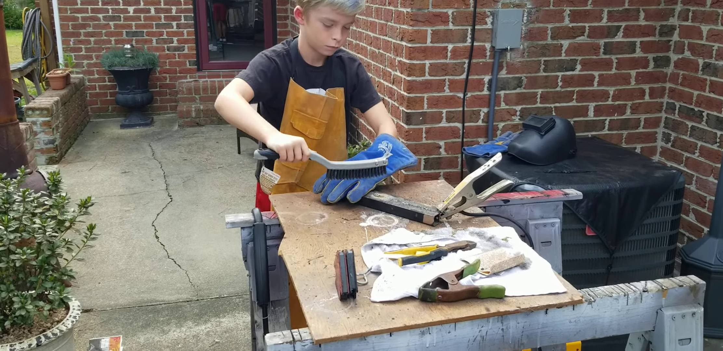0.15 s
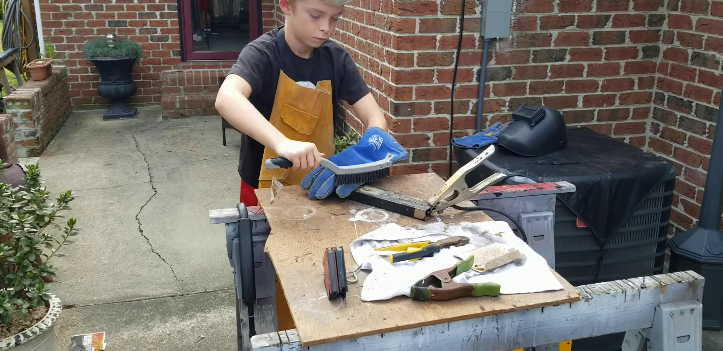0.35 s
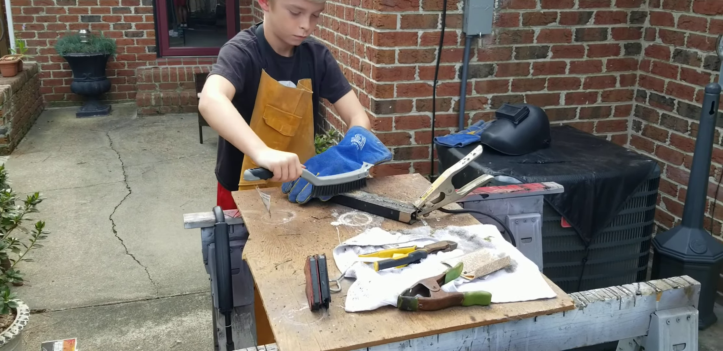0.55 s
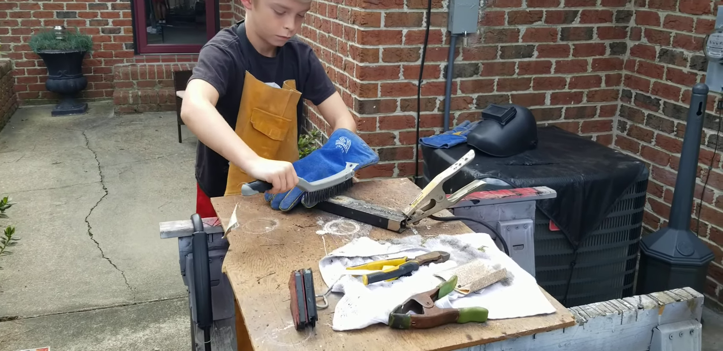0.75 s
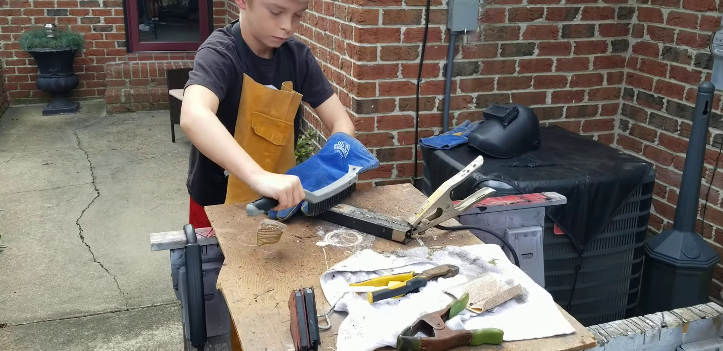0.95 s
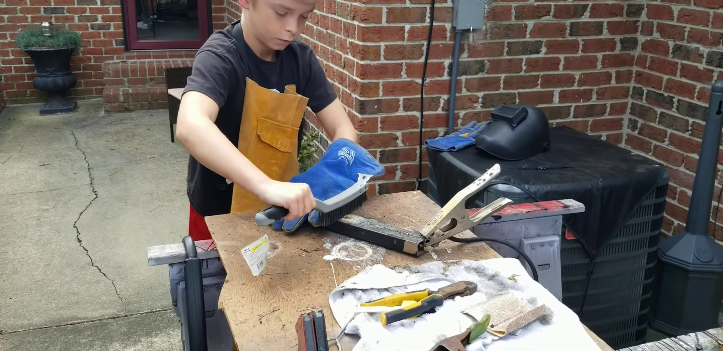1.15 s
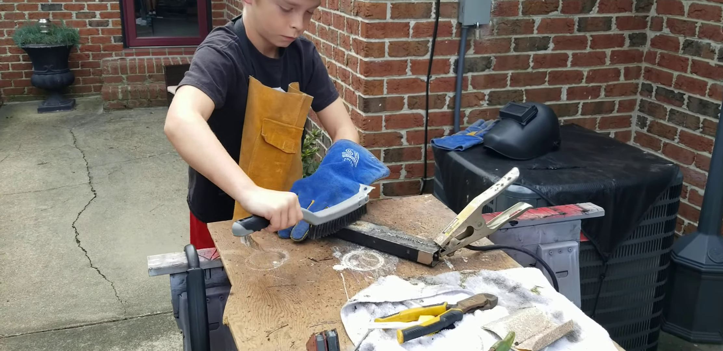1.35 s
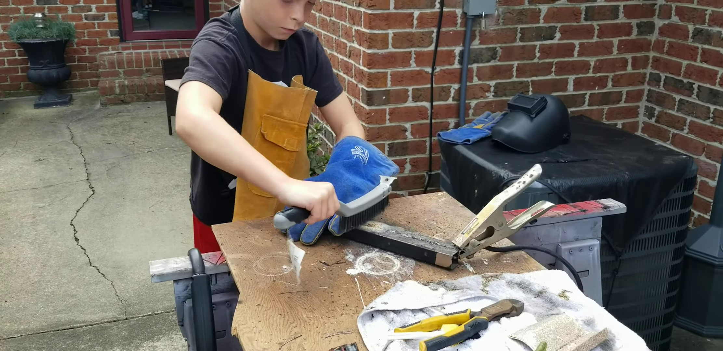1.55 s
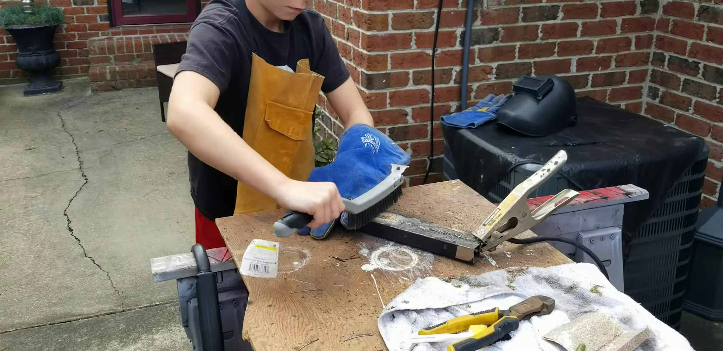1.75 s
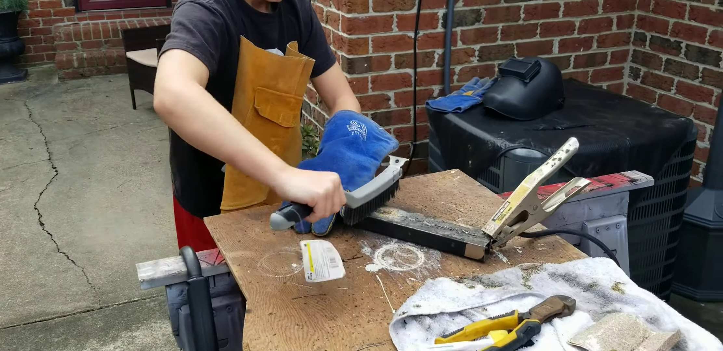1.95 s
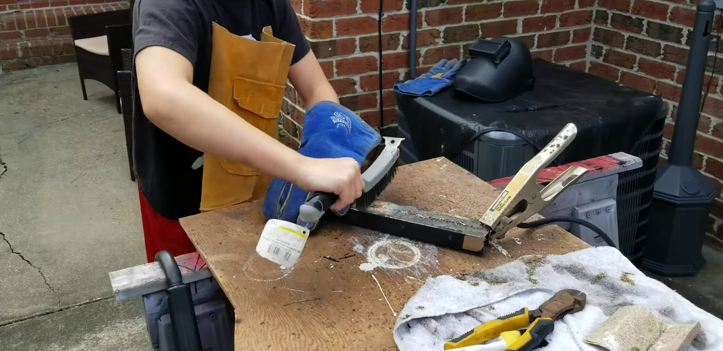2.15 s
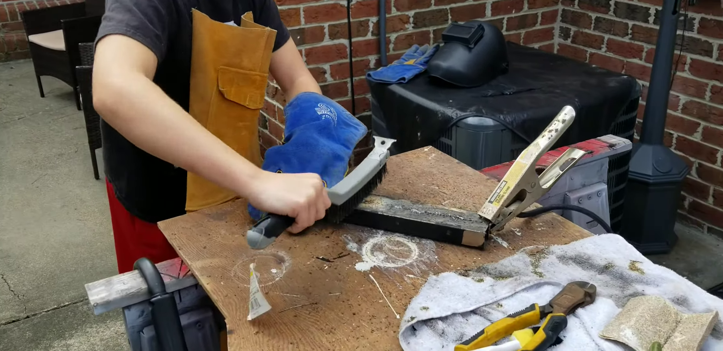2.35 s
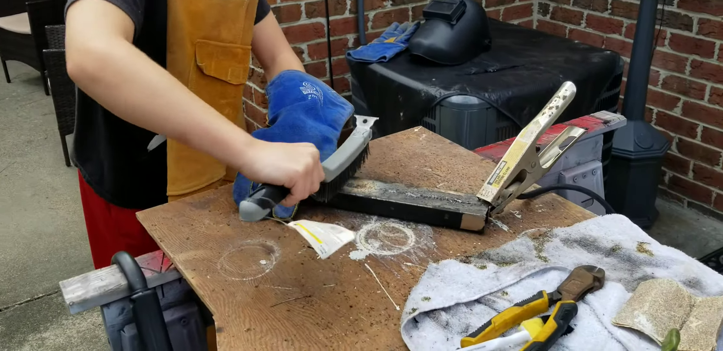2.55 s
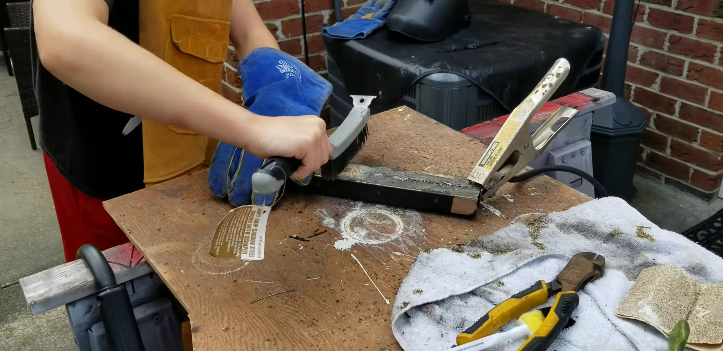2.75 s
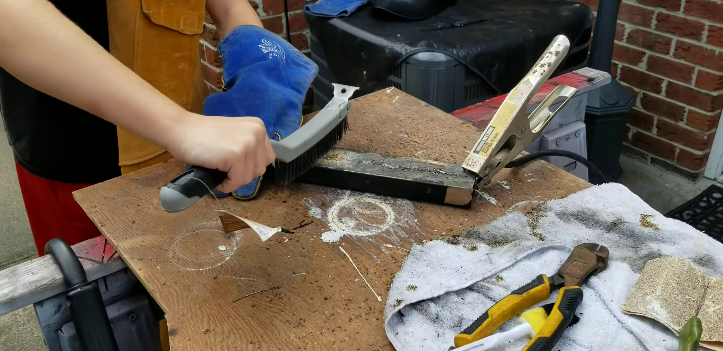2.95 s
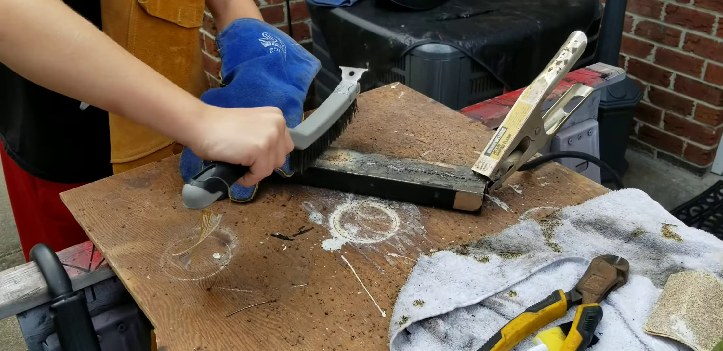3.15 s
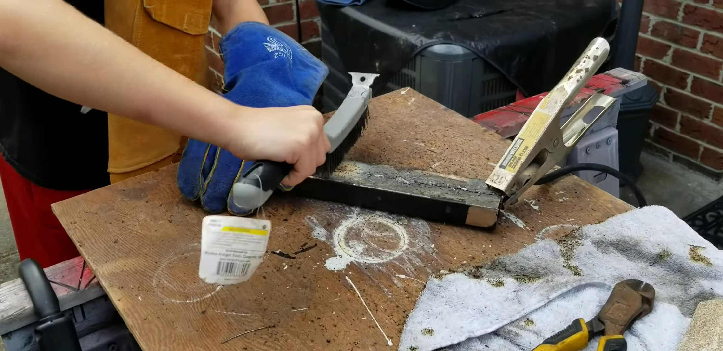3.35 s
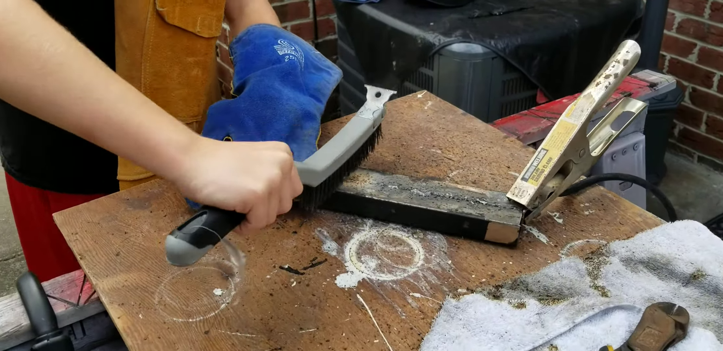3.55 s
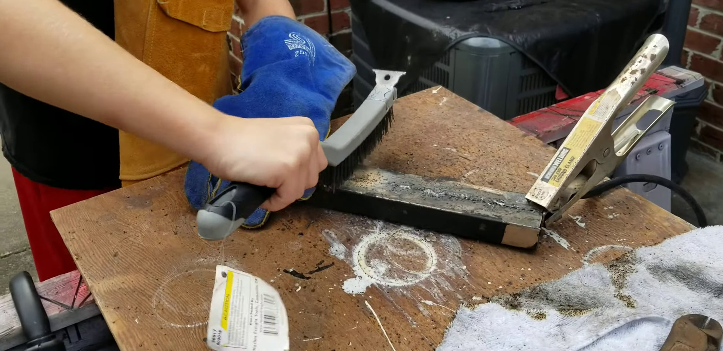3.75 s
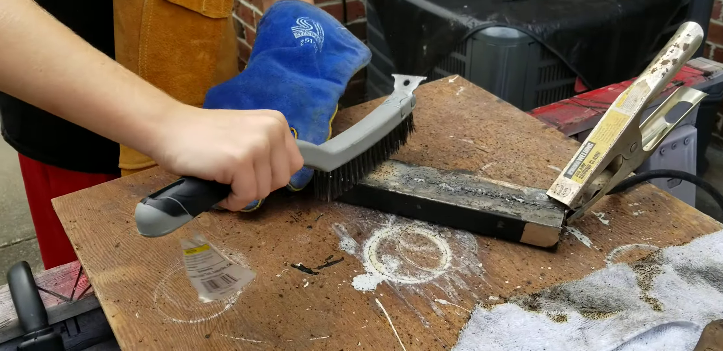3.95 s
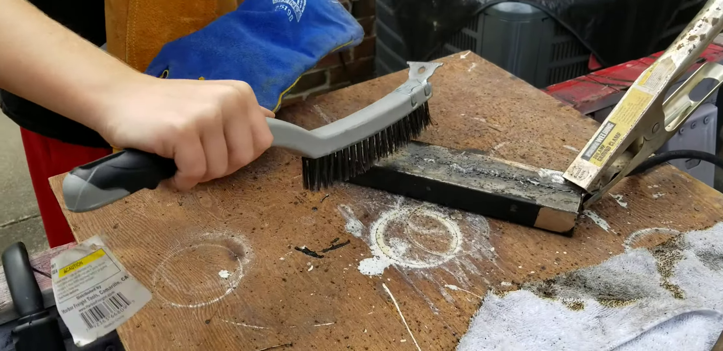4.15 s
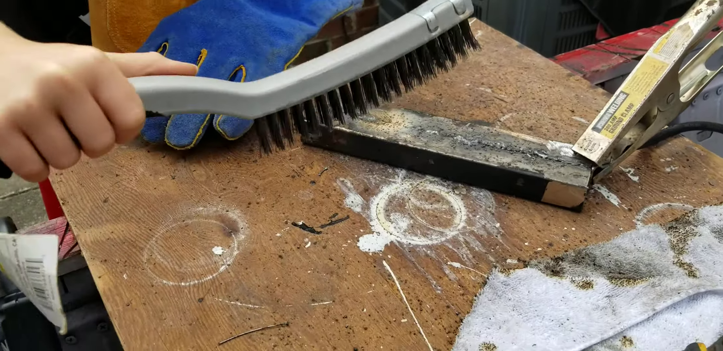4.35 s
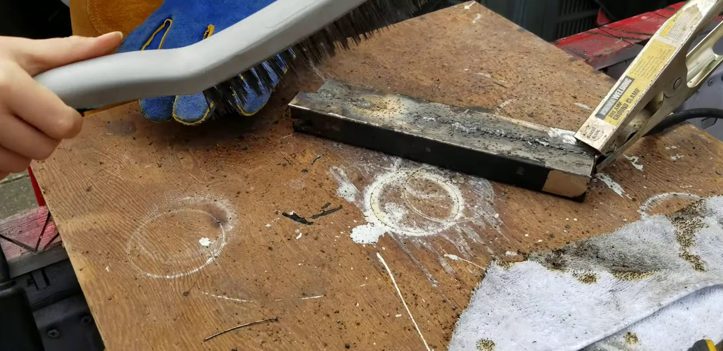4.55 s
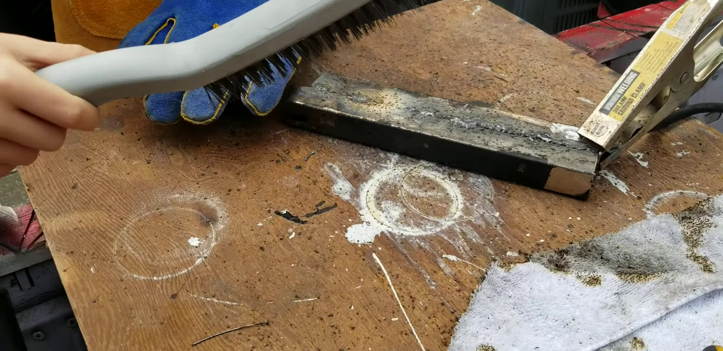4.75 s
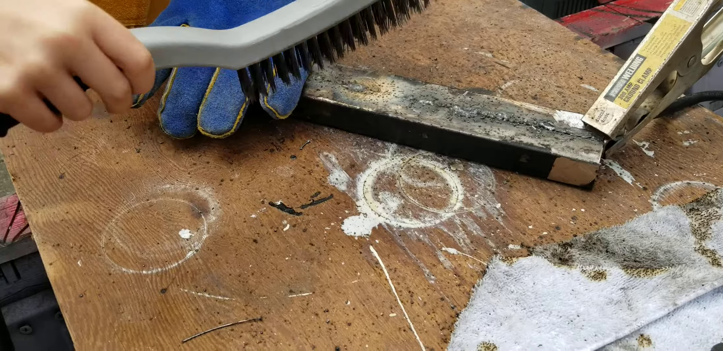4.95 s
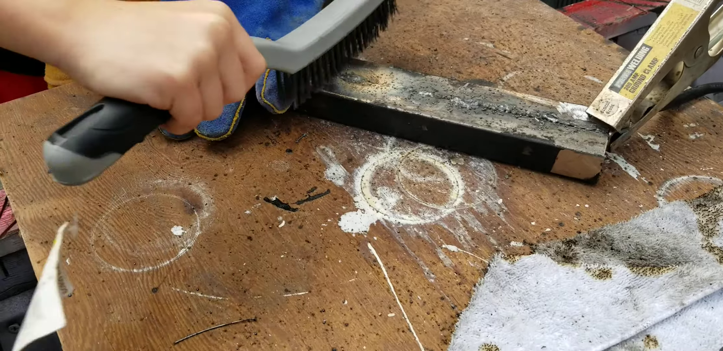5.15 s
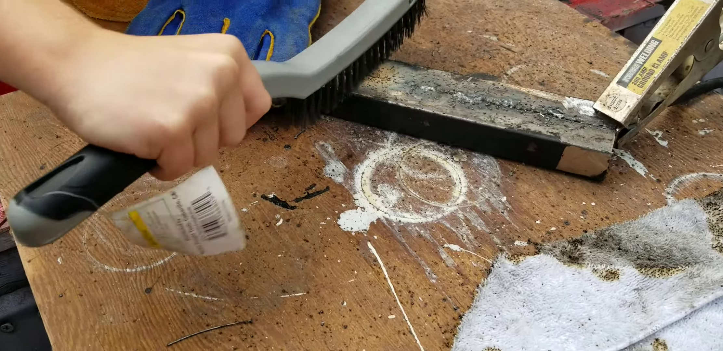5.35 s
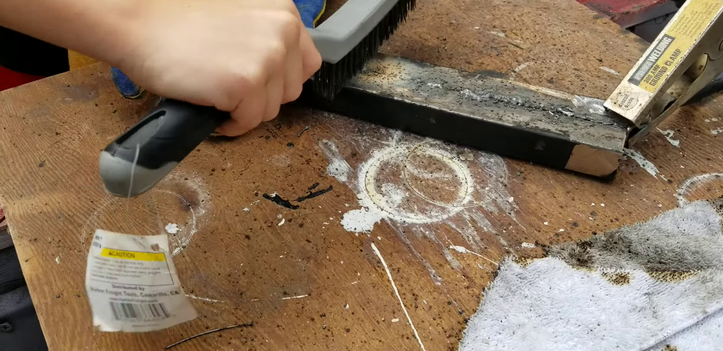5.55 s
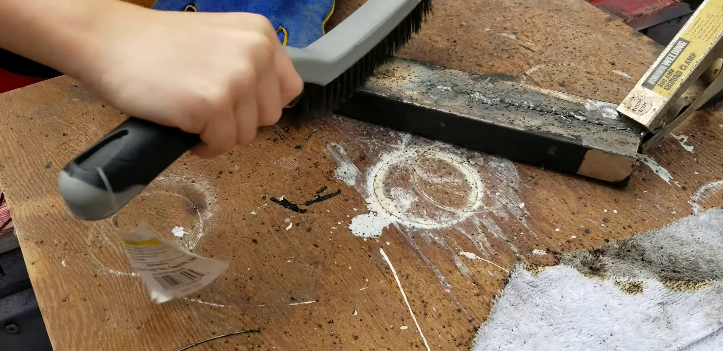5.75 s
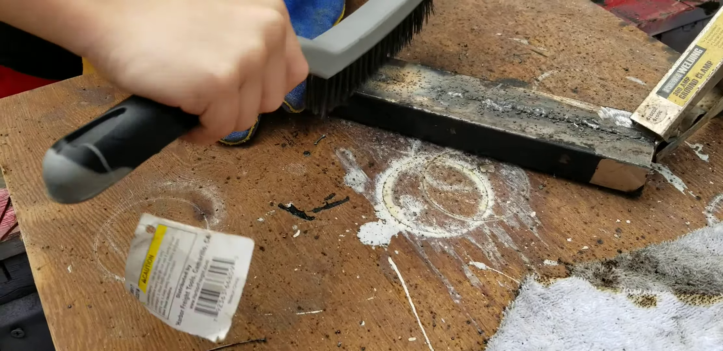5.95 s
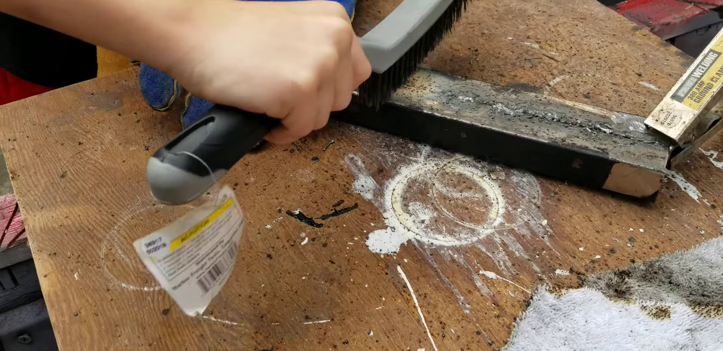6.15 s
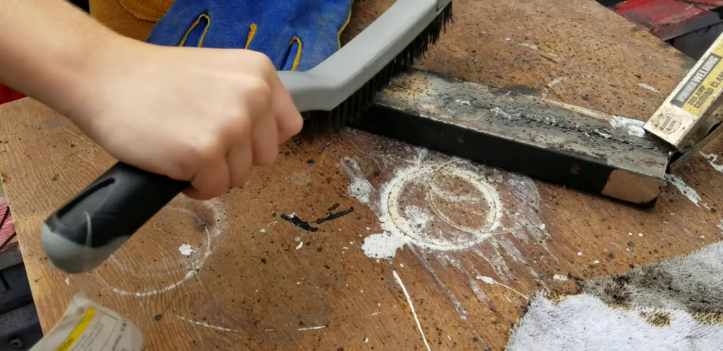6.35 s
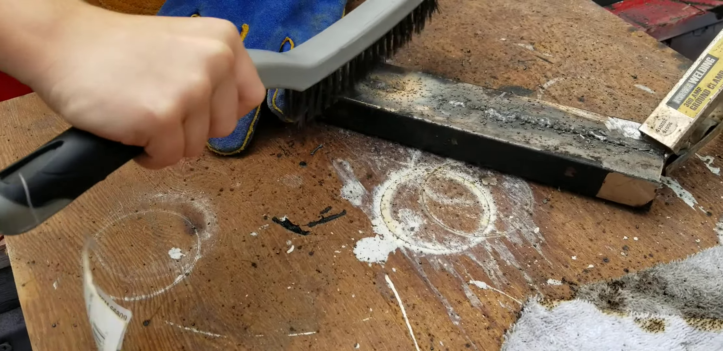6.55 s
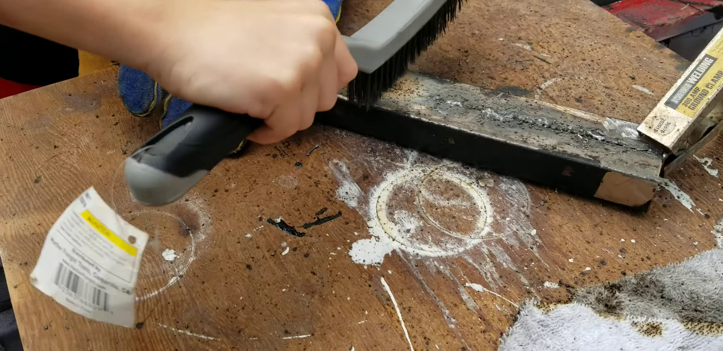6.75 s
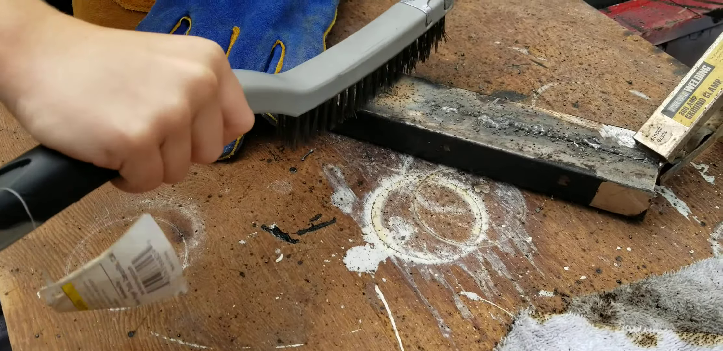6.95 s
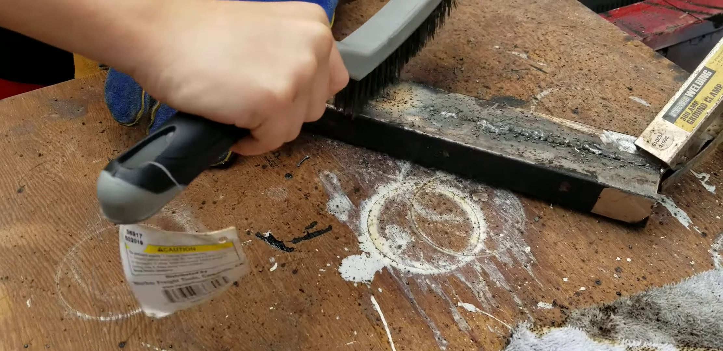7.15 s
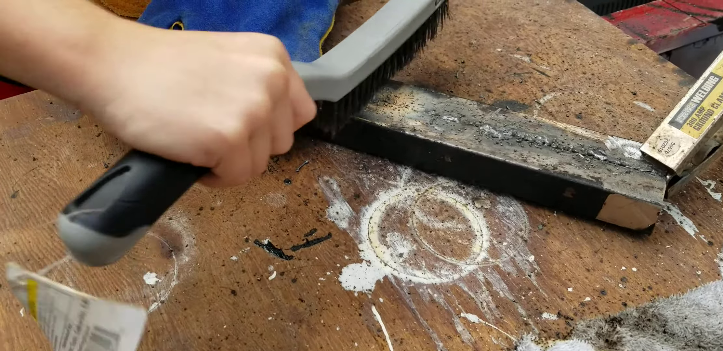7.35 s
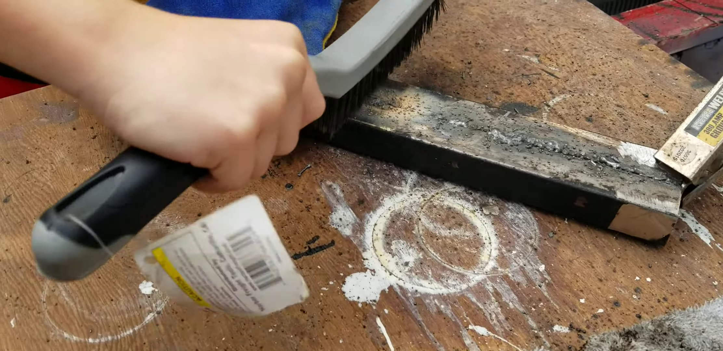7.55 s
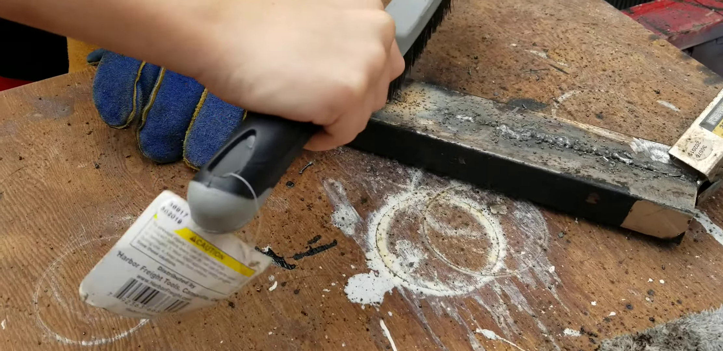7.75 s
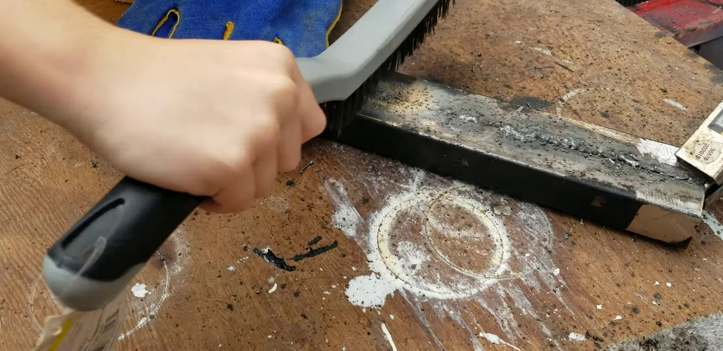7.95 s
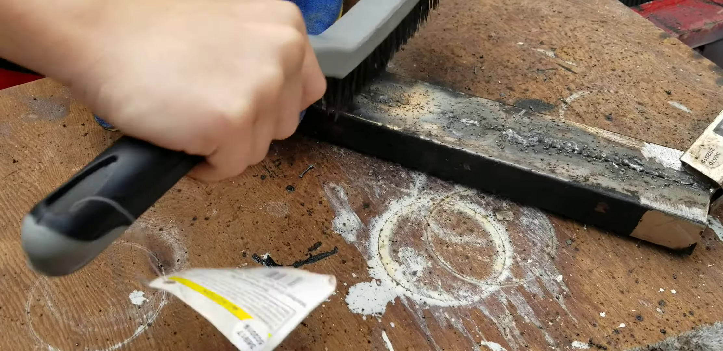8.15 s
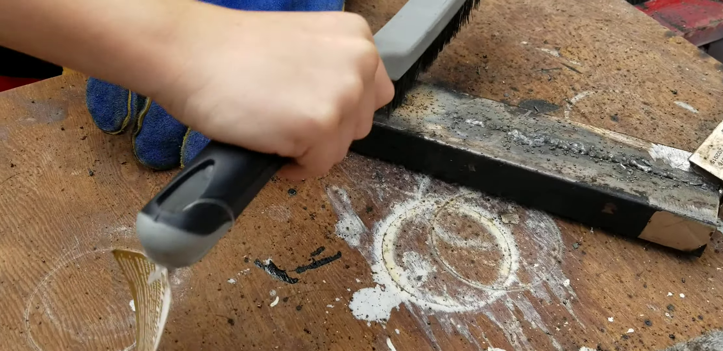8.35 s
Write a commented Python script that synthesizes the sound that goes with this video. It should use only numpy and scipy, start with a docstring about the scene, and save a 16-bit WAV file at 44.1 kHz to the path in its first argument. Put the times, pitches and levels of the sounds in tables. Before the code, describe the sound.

A hand wire brush scrubs a weld on a steel tube, back and forth about six strokes a second. The wires hiss and scratch, the tube rings lightly, and the plywood table rumbles underneath. After about three seconds the brush lifts for a second, then lands with a knock and scrubs on, closer and with a few sharp snaps. The microphone is near the work, on a quiet patio with a faint distant rumble.

```python
"""A quiet patio, a phone's two microphones close to a steel tube clamped to a plywood table.
A hand wire brush scrubs a weld on the tube, about six strokes a second, pulls and pushes in turn.
The hand's speed makes the wire tips sizzle and the tube ring; its pressure makes the tufts rasp and
the table rumble. The brush lifts for a second, and the microphones are closer for the second bout.
A faint outdoor rumble lies in the distance."""
import sys
import numpy as np
from scipy import signal
from scipy.fft import rfft, irfft
from scipy.io import wavfile
from scipy.ndimage import uniform_filter1d

SR = 44100
rng = np.random.default_rng(int(sys.argv[2]) if len(sys.argv) > 2 else 0)


def store_pcm(level_fs):
    """Save levels as 16-bit WAV."""
    pcm = np.round(np.clip(level_fs, -1, 1) * 32767).astype(np.int16)
    wavfile.write(sys.argv[1], SR, np.atleast_2d(pcm).T)


N = 374850
TIME = np.arange(N) / SR


def gain_of(db):
    """Decibels to amplitude."""
    return 10 ** (np.asarray(db) / 20)


def unit_rms(x):
    """Scales to rms 1."""
    return x / np.sqrt(np.mean(x ** 2) + 1e-20)


def spectrum_db(points, hz, column=1):
    """One column of a spectrum, joined on a log-frequency axis."""
    columns = np.transpose(points)
    return np.interp(np.log(hz + 1), np.log(columns[0] + 1), columns[column])


def add(mix, start_s, sound):
    """Mixes a sound in, cut off where the mix ends."""
    part = mix[..., round(start_s * SR):][..., :sound.shape[-1]]
    part += sound[..., :part.shape[-1]]


def wander(hz):
    """Random drift of rms 1, changing about hz times a second."""
    knots = rng.standard_normal(4096)
    return unit_rms(np.interp(TIME * hz, np.arange(len(knots)), knots))


def lagged(x, seconds):
    """Follows x with the given time constant."""
    keep = np.exp(-1 / (seconds * SR))
    return signal.lfilter([1 - keep], [1, -keep], x + 1e-12)


def response(curve_db, size=4096):
    """Causal impulse response of energy 1 for a gain curve in dB."""
    hz = abs(np.fft.fftfreq(size, 1 / SR))
    log_gain = np.log(gain_of(np.maximum(curve_db(hz), -100)))
    minimum_phase = np.exp(np.conj(signal.hilbert(log_gain)))
    taps = np.fft.ifft(minimum_phase).real[:size // 2]
    return taps / np.linalg.norm(taps)


def colour(x, points, column=1):
    """Passes x through a body with the given spectral shape."""
    return signal.oaconvolve(x, response(lambda hz: spectrum_db(points, hz, column)))[:N]


def resonate(x, hz, width_hz):
    """One mode, of gain about 1 at its centre."""
    r = np.exp(-np.pi * width_hz / SR)
    return signal.lfilter([1 - r, 0, r - 1], [1, -2 * r * np.cos(2 * np.pi * hz / SR), r * r], x)


def slips(per_s, spread_db):
    """Stick and slip: random clicks of uneven size, rms 1 overall."""
    size = gain_of(spread_db * np.minimum(rng.exponential(1, N), 4)) * rng.choice([-1, 1], N)
    return unit_rms(size * (rng.random(N) < per_s / SR))


# Distant outdoor rumble and microphone hiss: (frequency [Hz], relative level [dB])
AIR_SPECTRUM = [(25, -33.5), (45, 3), (64, 7.5), (80, 4.5), (115, 5), (170, -4), (300, -15.5), (600, -19),
                (1300, -19.5), (2200, -39.5), (5000, -39.5), (7800, -57), (12000, -27.5), (15600, -45)]

def air():
    """Far-off rumble, mostly common to both microphones, with a thin separate hiss in each."""
    hz = np.fft.rfftfreq(N, 1 / SR)
    common, left, right = rfft(rng.standard_normal((3, N)))
    coherence = 0.74 / (1 + (hz / 1100) ** 2)
    pair = np.sqrt(coherence) * common + np.sqrt(1 - coherence) * np.array([left, right])
    noise = unit_rms(irfft(pair * gain_of(spectrum_db(AIR_SPECTRUM, hz)), N))
    return noise * gain_of([[-48], [-51.5]]) * gain_of(1.2 * wander(5))


# The lifted brush touches the glove: (time [s], length [s], level [dB])
GLOVE_TOUCHES = [(0.39, 0.48, -52), (4.813, 0.15, -56)]
# Wire on leather: (frequency [Hz], relative level [dB])
GLOVE_SPECTRUM = [(600, 10), (2000, -4), (5000, -5), (8000, -16), (11000, 5), (13500, 1), (16000, 2)]

def glove_grazes():
    """Wires graze the glove, left of centre: faint rustles that rise quickly and fade."""
    level = sum(gain_of(db) * np.interp(TIME, [s, s + 0.081 * length, s + length], [0, 1, 0])
                for s, length, db in GLOVE_TOUCHES)
    rustle = [colour(level * slips(3000, spread_db=5.5), GLOVE_SPECTRUM) for _ in range(2)]
    return np.array(rustle) * gain_of([[0], [-5]])


# Pulls and pushes in turn, a pull first:
# (time [s], speed [dB], pressure [dB], fastest point [share of the stroke])
HAND_STROKES = [(0.544, -1.5, 0, 0.1), (0.695, 3, -10, 0.75), (0.957, -4, -1, 0.24), (1.086, 5.5, -2, 0.31),
                (1.266, 2, 0, 0.3), (1.391, 7, 0, 0.3), (1.567, 2, 3.0, 0.35), (1.717, 9.5, 1, 0.35),
                (1.895, 2.5, -0.0, 0.39), (2.044, 4.5, 4.5, 0.23), (2.216, 1.5, 5.0, 0.31),
                (2.361, 7, 3.5, 0.25), (2.517, 0.5, 6, 0.47), (2.647, 5.5, 4, 0.29), (2.859, 0.5, 0, 0.48),
                (2.998, 7, 1.5, 0.47), (3.151, -1, 4.5, 0.26), (3.259, 3, 1.5, 0.52),
                (3.44, 6.0, 4.5, 0.47), (3.6, 9, 2.5, 0.3), (3.751, 0.5, 0.5, 0.31), (3.906, -38, -30, 1),
                (4.012, -32, -18.5, 0.23), (5.121, -13, 9.5, 0), (5.277, -8.5, 5, 0.34),
                (5.432, 4, 5.5, 0.39), (5.575, -4, 9.5, 0.48), (5.709, 3.5, 4, 0.4), (5.898, -5, 9.5, 0.54),
                (6.038, 7, 5, 0.36), (6.177, 1, 10, 0.56), (6.311, 5, 1.5, 0.48), (6.501, 4.5, 4, 0.55),
                (6.612, 4.5, 4.5, 0.6), (6.806, 1, 9.5, 0.69), (6.967, 8, 6, 0.42), (7.148, 0.5, 5.5, 0.61),
                (7.303, 6.5, 4, 0.43), (7.502, 1.0, 4, 0.34), (7.623, 6, 6, 0.49), (7.791, 5, 6.0, 0.32),
                (7.938, 4, 4.5, 0.51), (8.107, 4.5, 3, 0.43), (8.246, 7, 2.5, 0.56),
                (8.464, -0.5, 7.5, 0.29)]

def stroke(longest_s=0.19):
    """The hand at each moment: share of stroke done, speed, pressure, fastest point, 1 on a push."""
    start, speed_db, pressure_db, crest = np.transpose(HAND_STROKES)
    length = np.minimum(np.diff(start, append=np.inf), longest_s)
    k = np.maximum(np.searchsorted(start, TIME) - 1, 0)
    done = np.clip((TIME - start[k]) / length[k], 0, 1)
    return done, speed_db[k], pressure_db[k], crest[k], k % 2


def swell(power, catch, push_lead):
    """The wires grip at the turn, then the hand speeds up and slows in one arch, earlier on a push."""
    done, _, _, crest, push = stroke()
    peak = np.clip(crest - push_lead * push, 0.04, 0.9)
    arch = abs(np.sin(np.pi * done ** (np.log(0.5) / np.log(peak))))
    bend = (1 - done) ** (0.5 / peak) * (done > 0)
    # bent tufts flip over and grip again: at once on a pull, more softly on a push
    grip = lagged(bend * (1 - push), seconds=0.0018) + lagged(bend * push, seconds=0.007)
    return arch ** power + catch * grip


# How clearly the tube reaches the microphones: (time [s], relative level [dB])
MIC_APPROACH = [(.5, -5), (2, -3), (3.6, -1), (5.2, 1), (8.4, 1)]

def nearness_db():
    """Rises as the microphones move in on the work."""
    return np.interp(TIME, *np.transpose(MIC_APPROACH))


# The brush stays on the steel: (start [s], end [s])
SCRUB_BOUTS = [(.68, 3.98), (5.12, 8.6)]

def dragged(level, drag_db, near_share):
    """Some wires keep sliding through every turn, putting a floor under the level."""
    touching = sum((TIME > begin) & (TIME < end) for begin, end in SCRUB_BOUTS)
    sliding = lagged(touching, seconds=0.017)  # wires land and leave one after another
    return np.hypot(level, sliding * gain_of(drag_db + near_share * nearness_db()))


def pings(drive, t60, low_hz, high_hz, count):
    """Wires that spring free ring briefly, each at a pitch of its own."""
    t, out = np.arange(2048) / SR, np.zeros(N)
    when, pitch, size = rng.random((count, 3)).T
    hz = low_hz + pitch * (high_hz - low_hz)
    rings = np.sin(2 * np.pi * np.outer(hz, t)) * gain_of(-60 * t / t60)
    strength = unit_rms(size ** 2) * drive[(when * N).astype(int)]
    rings *= np.sqrt(N / np.sum(rings ** 2)) * strength[:, None]
    for s, ring in zip(when * N / SR, rings):
        add(out, s, ring)
    return out


def shifting_tufts(x, depth_db):
    """Different tufts touch from moment to moment: the colour shifts in narrow patches of some 70 ms."""
    bins = signal.stft(x, nperseg=512)[2]
    patches = uniform_filter1d(rng.standard_normal(bins.shape[-2:]), size=2, axis=0)
    for _ in range(2):
        patches = uniform_filter1d(patches, size=10, axis=1)
    gains = unit_rms(gain_of(depth_db * unit_rms(patches)))
    return signal.istft(bins * gains, nperseg=512)[1][..., :N]


# Hiss of the wire tips: (frequency [Hz], relative level [dB])
TIP_SPECTRUM = [(3000, -34.5), (7000, -14), (8300, -20), (9300, -6), (10800, -3), (12700, 2), (13800, 3.5),
                (15600, -14)]

def tip_sizzle(clumps):
    """Thousands of tips stick and slip with the hand's speed, almost all in the left microphone."""
    _, speed_db, _, _, _ = stroke()
    level = gain_of(-25 + speed_db) * swell(power=2.65, catch=0.99, push_lead=0.01)
    drive = clumps * dragged(level, drag_db=-33, near_share=0.99)
    hiss = gain_of(-9.5) * colour(drive * slips(10000, spread_db=-1), TIP_SPECTRUM)
    wires = gain_of(-14.5) * pings(drive, t60=0.018, low_hz=9546, high_hz=13570, count=2500)
    return (hiss + wires) * gain_of([[0], [-24]])


# Scrape radiated by the tube: (frequency [Hz], left relative level [dB], right relative level [dB])
SCRAPE_SPECTRUM = [(300, -2, 1), (907, -11.5, -12.5), (1990, -10.5, -9), (2560, -3, 4), (3600, -6, -3.5),
                   (4990, -1, 6), (6120, 0.5, -12), (7040, -11, -10.5), (9060, 1.5, -6.5),
                   (10000, -14.5, 0), (12200, -3.5, 2), (16400, 1, 4.5)]

def steel_scrape(clumps):
    """Wires bite the steel with speed and pressure, more on a push; the longer ones ping."""
    _, speed_db, pressure_db, _, push = stroke()
    level_db = -42 + 0.59 * speed_db + 0.36 * pressure_db + 0.94 * push + 0.9 * nearness_db()
    level = gain_of(level_db) * swell(power=1.46, catch=1, push_lead=0.01)
    bite = clumps * dragged(level, drag_db=-44, near_share=1.27)
    # the two microphones hear partly different faces of the tube
    shared = slips(10000, spread_db=7)
    faces = [unit_rms(shared + 2.6 * slips(10000, spread_db=1)) for _ in range(2)]
    scrape = np.array([colour(bite * face, SCRAPE_SPECTRUM, side) for side, face in enumerate(faces, 1)])
    wires = np.array([pings(bite, t60=0.034, low_hz=3190, high_hz=7490, count=2200) for _ in range(2)])
    return (scrape + gain_of(-13) * wires) * gain_of([[1], [0]])


def brush():
    """Sizzle and scrape come in clumps as the tufts cross the ripples of the weld bead."""
    clumps = gain_of(1.2 * wander(90) + 1.3 * wander(450))
    clumps *= gain_of(0.5 * wander(23.23))  # the uneven bead makes each stroke swell and falter
    return shifting_tufts(tip_sizzle(clumps) + steel_scrape(clumps), depth_db=2.8)


# The tube and its clamp: (frequency [Hz], width [Hz], left lift [dB], right lift [dB])
TUBE_MODES = [(2637, 30, 4, 11), (2990, 30, 0, 1), (3125, 30, -1, -1), (3500, 45, -2, -1),
              (4180, 90, -4, -2), (4685, 40, 0, 2), (5100, 70, 0, 2), (5268, 45, 1, 1), (5641, 25, 4, -2),
              (5735, 35, 0, -4), (5826, 45, 5, -1), (6030, 55, 2, -3), (6243, 36, 7, 2), (6480, 35, -1, -3),
              (6985, 45, 5, 0), (7360, 50, 0, -3), (8955, 50, 7, 5), (9430, 70, -2, -3),
              (10110, 60, -3, -4), (10822, 55, 5, 2), (11692, 45, 3, 3), (12430, 60, -1, 2),
              (12603, 90, -2, -1), (12905, 60, -2, 0), (13498, 65, -3, -3)]

def tube_ring(contact, drift_db, drift_hz):
    """The steel rings on top of the brushing; each mode swells and fades as the contact point travels."""
    drive = contact * gain_of(nearness_db())
    out = contact.copy()
    for hz, width, left_db, right_db in TUBE_MODES:
        drift = gain_of(drift_db * wander(drift_hz))
        out += gain_of([[left_db], [right_db]]) * resonate(drive * drift, hz, width)
    return out


# Tufts dragged across the bead: (frequency [Hz], relative level [dB])
RASP_SPECTRUM = [(400, -6.5), (800, -3), (1100, -7.5), (1450, -2), (1900, -2), (2150, -11), (3200, -13.5),
                 (6000, -33.5)]

def tuft_rasp():
    """Coarse, gritty catches where the brush is pressed into the bead."""
    _, speed_db, pressure_db, _, push = stroke()
    level_db = -53 + 0.1 * speed_db + 0.5 * pressure_db - 1.6 * push
    force = gain_of(level_db) * swell(power=1.17, catch=0.24, push_lead=0.12)
    shared = slips(1700, spread_db=4.5)
    catches = [unit_rms(shared + 0.27 * slips(1800, spread_db=4.5)) for _ in range(2)]
    grit = np.array([colour(force * side, RASP_SPECTRUM) for side in catches])
    return gain_of([[0], [-1.5]]) * shifting_tufts(grit, depth_db=4.5)


# The plywood under the work: (frequency [Hz], relative level [dB])
PLYWOOD_SPECTRUM = [(40, -19.5), (80, -1), (112, 3.5), (148, 1), (175, -7), (215, -4), (272, -1), (315, -7),
                    (365, -15), (480, -18), (600, -15.5), (780, -22.5), (1000, -33), (2000, -57.5)]
# The brush lands or a tuft jams against the bead: (time [s], peak level [dB])
TABLE_JOLTS = [(.547, -22), (.96, -28), (3.838, -22), (5.124, -17), (5.44, -19), (5.926, -21), (6.223, -22),
               (6.915, -18), (7.232, -18)]
# Hollow ring of the table top: (frequency [Hz], width [Hz], lift [dB])
PLYWOOD_MODES = [(205, 25, -4), (269, 25, -2), (310, 30, -2), (520, 25, -3), (584, 30, 2), (645, 30, -4),
                 (745, 25, -1), (922, 35, 6)]

def table_rumble():
    """Snagging tufts shake the plywood as hard as the hand presses; a few jolts come on top."""
    _, _, pressure_db, _, _ = stroke()
    level = gain_of(-40.5 + pressure_db) * swell(power=1.09, catch=0.39, push_lead=0.19)
    force = dragged(level, drag_db=-46, near_share=1.3)
    snags = slips(900, spread_db=2.5) * force * gain_of(1.5 * wander(30))
    boards = colour(snags, PLYWOOD_SPECTRUM)
    knock = response(lambda hz: spectrum_db(PLYWOOD_SPECTRUM, hz))
    for s, db in TABLE_JOLTS:
        add(boards, s, gain_of(db) * knock / abs(knock).max())
    hollow = sum(gain_of(db) * resonate(boards, hz, width) for hz, width, db in PLYWOOD_MODES)
    return (boards + hollow) * gain_of([[0], [-2.8]])


# Single cracks at the weld:
# (time [s], peak level [dB], centre [Hz], half-width [octaves], left minus right [dB])
WIRE_SNAPS = [(0.546, -26, 12200, 0.89, 23), (0.547, -34.5, 4340, 0.54, 3), (0.704, -27, 12700, 0.16, 24),
              (0.877, -35.5, 1130, 0.85, 3), (3.235, -33.5, 1700, 1.14, 0), (4.194, -52, 11100, 0.55, 9),
              (5.124, -19.5, 12770, 0.11, 17), (5.164, -34, 1570, 0.5, 2), (5.689, -22.5, 1710, 1.14, 6.5),
              (7.459, -21.5, 3260, 1.5, 8), (7.568, -25, 2000, 2.4, 1)]

def snaps(t60=0.022):
    """Wire and scale snap: short dry bursts, each in a band of its own."""
    out, t = np.zeros((2, N)), np.arange(1024) / SR
    for s, db, hz, octaves, pan_db in WIRE_SNAPS:
        band = response(lambda f: -6 * (np.log2((f + 1) / hz) / octaves) ** 2)
        burst = rng.standard_normal(len(t)) * gain_of(-60 * t / t60)
        crack = signal.fftconvolve(burst, band)
        add(out, s, gain_of([[db + pan_db / 2], [db - pan_db / 2]]) * crack / abs(crack).max())
    return out


def patio(x, t60, wet_db):
    """Adds sparse, quickly dying reflections from table top, concrete and brick."""
    t = np.arange(16384) / SR
    taps = rng.standard_normal((2, len(t))) * (rng.random((2, len(t))) < 0.05)
    taps *= (t > 0.003) * gain_of(-60 * t / t60)
    taps /= np.linalg.norm(taps, axis=1, keepdims=True)
    crossfed = x + 0.12 * x[::-1]
    return x + gain_of(wet_db) * signal.oaconvolve(crossfed, taps, axes=1)[:, :N]


def scene():
    """The brushwork close up on the patio, over the table's rumble and the distant air."""
    work = tube_ring(brush(), drift_db=2.5, drift_hz=13) + snaps() + tuft_rasp() + glove_grazes()
    return patio(work, t60=0.12, wet_db=-6) + table_rumble() + air()


def record(dry):
    """The phone cuts off the highest treble."""
    edge_hz = 15780
    lowpass = signal.firwin(511, edge_hz, window=("kaiser", 9), fs=SR)
    return signal.oaconvolve(dry, lowpass[None], "same")


dry = scene()
out = record(dry)
store_pcm(out)
```